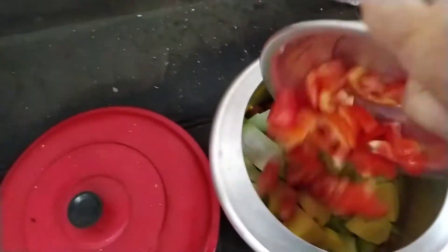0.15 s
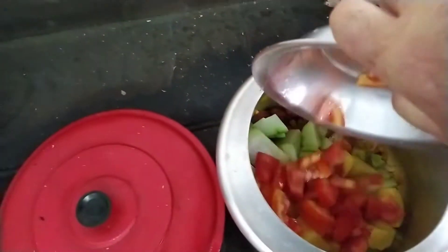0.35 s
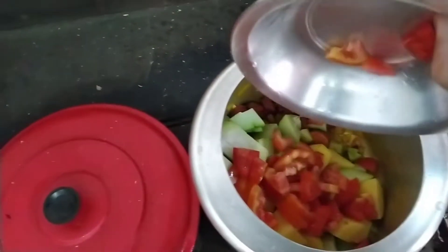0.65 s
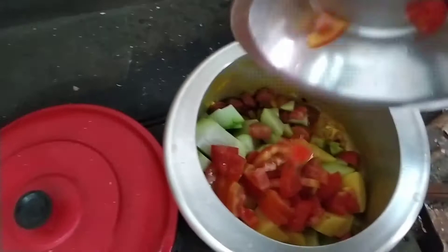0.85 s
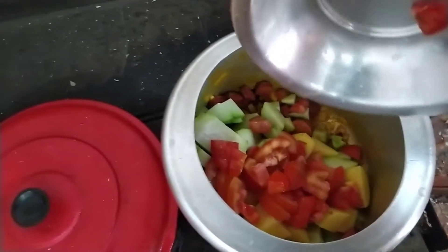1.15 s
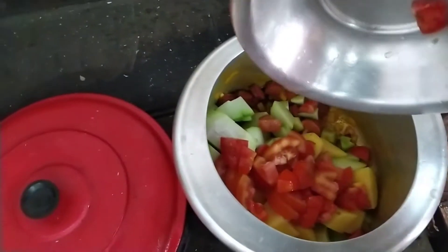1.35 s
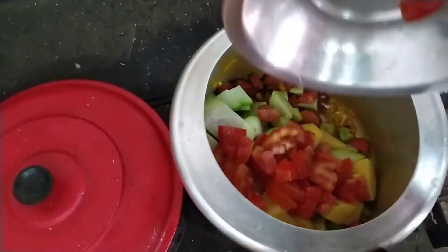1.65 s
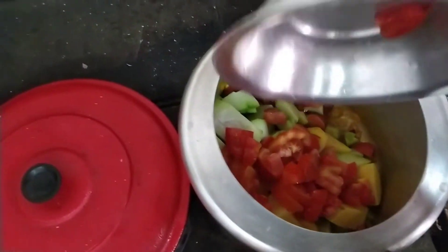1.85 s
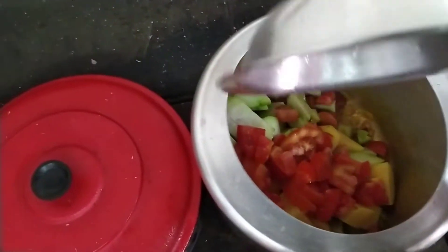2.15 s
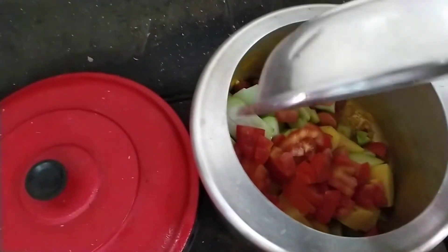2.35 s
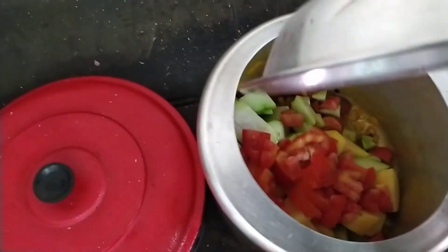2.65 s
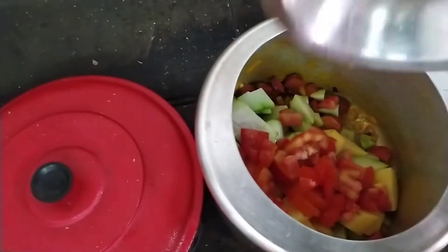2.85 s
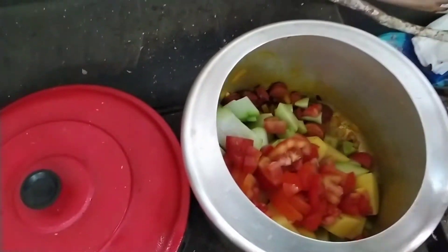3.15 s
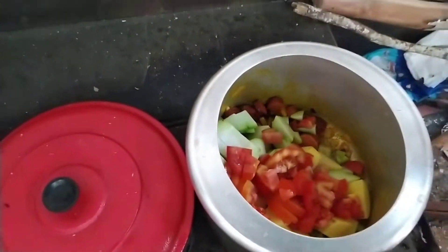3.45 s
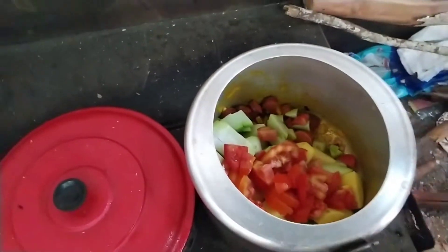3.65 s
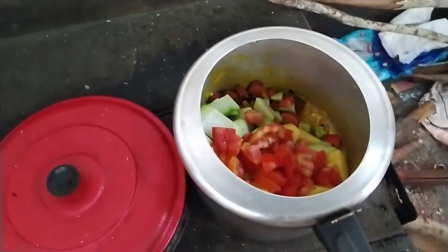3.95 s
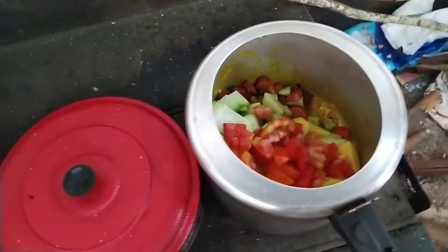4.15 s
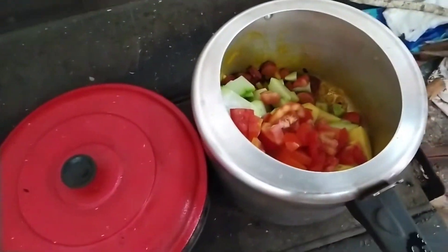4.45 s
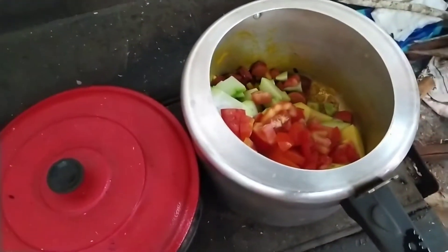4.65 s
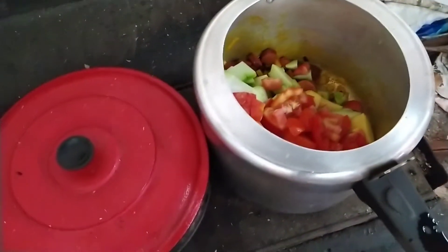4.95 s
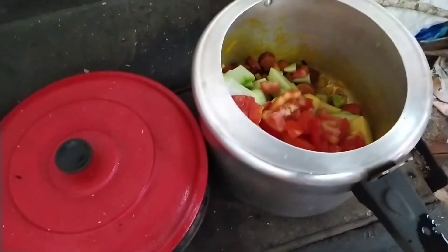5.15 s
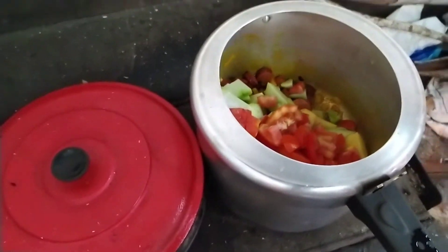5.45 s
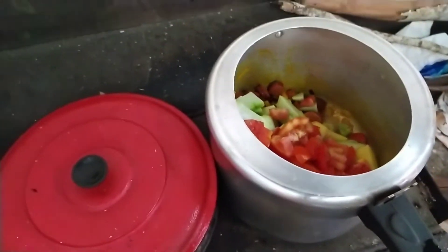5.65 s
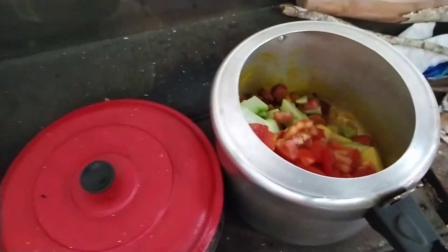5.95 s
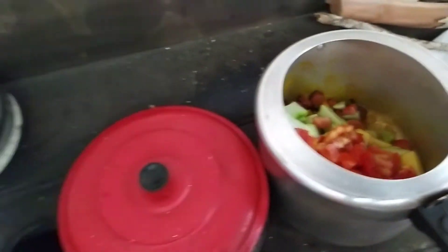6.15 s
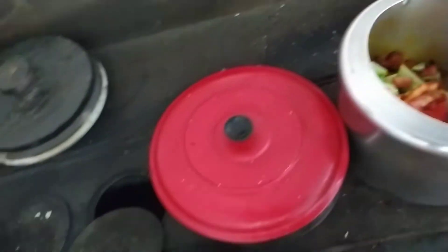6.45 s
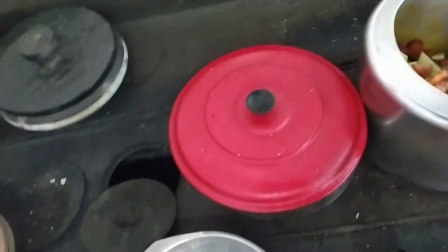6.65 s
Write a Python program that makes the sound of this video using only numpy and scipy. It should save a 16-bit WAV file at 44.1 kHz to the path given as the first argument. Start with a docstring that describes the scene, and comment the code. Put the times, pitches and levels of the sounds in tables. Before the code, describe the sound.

Chopped tomatoes slide off a steel plate into a hot pot, plopping in a quick cluster with a juicy hiss. Steady frying grows stronger under six damped, clanking knocks on the rim, sounding boxier while the plate covers the opening. After a stretch of sizzling alone, the plate clanks down and quickly rocks still. Close handheld stereo microphone in a small kitchen, with low room noise and a weak hum.

```python
"""Frying pot and steel plate

Meat and vegetables sizzle close by in an aluminium pressure pot: random bubble clicks over noise.
Chopped tomato slides in from a steel plate: noise slaps, hollow thuds and pot modes.
The plate is rapped six times on the rim, then put down, where it clanks and rocks to rest:
noise knocks and decaying modes. Low room noise and a wavering hum lie beneath."""
import sys
import numpy as np
from scipy import signal
from scipy.fft import rfft, irfft
from scipy.io import wavfile
from scipy.ndimage import uniform_filter1d

SR = 44100
rng = np.random.default_rng(int(sys.argv[2]) if len(sys.argv) > 2 else 0)


def wrap_up_sound(samples):
    """Save the sound to the file named by the first command line argument, as 16-bit audio."""
    columns = np.atleast_2d(samples).T
    # keep every value between -1 and 1, then stretch to whole-number steps
    tamed = np.clip(columns, -1, 1)
    steps = np.round(tamed * 32767).astype(np.int16)
    wavfile.write(sys.argv[1], SR, steps)


N = 299433

# how hard the pot fries, before trim: time_s, fizz_db, fry_db
FRYING_LEVELS = [(0.0, -42, -47), (0.21, -40.5, -51), (0.49, -41, -52), (0.77, -36.5, -48.5),
                 (1.08, -33, -44), (1.57, -31, -40.5), (1.89, -31.5, -39.5), (2.4, -30, -34.5),
                 (2.93, -33, -40.5), (3.82, -35.5, -43.5), (4.8, -33.5, -43.5), (5.75, -37, -45),
                 (6.17, -34.5, -46), (6.79, -37, -48.5)]
# fine fizz spectrum: freq_hz, density_db (per Hz)
FIZZ_SPECTRUM = [(3000, -40), (6000, -20), (7200, -8.5), (8300, -2.3), (9500, 0), (10200, -.8),
                 (11000, -8.5), (12200, -15.5), (14000, -19), (16000, -20.5)]
# coarser frying spectrum: freq_hz, density_db (per Hz)
FRY_SPECTRUM = [(150, -27), (350, -13), (700, -7), (1300, -5), (2200, 0), (3200, -0.5), (4500, 0.5),
                (6000, 0), (9000, -2.5), (15000, -57)]


def sizzle(fizz_trim_db=2.2, fry_trim_db=4.5, flutter_db=0.9, right_lean_db=0.46):
    """Fine fizz and coarser frying, sputtering together; both swell as tomato juice reaches the fat."""
    t = np.arange(N) / SR
    fine = colour(bubbles(per_s=5000, spread_db=2.0, wash=1.24), FIZZ_SPECTRUM)
    coarse = colour(bubbles(per_s=2200, spread_db=1.6, wash=1.1), FRY_SPECTRUM)
    fizz = pot_air(fine, ripple_db=1.1) * amp(curve(FRYING_LEVELS, t) + fizz_trim_db)
    fry = pot_air(coarse, ripple_db=2.65) * amp(curve(FRYING_LEVELS, t, axis=2) + fry_trim_db)
    leaning_fizz = fizz * amp([[-right_lean_db], [right_lean_db]])
    return (leaning_fizz + fry) * amp(flutter_db * wander(top_hz=22.5))


def bubbles(per_s, spread_db, wash):
    """Steam bubbles bursting in fat: clicks of uneven size over a wash of countless tiny ones."""
    size = amp(spread_db * np.minimum(rng.exponential(1, (2, N)), 5))
    sign = rng.choice([-1, 1], (2, N))
    bursts = rng.random((2, N)) < per_s / SR
    return unit(size * sign * bursts) + wash * rng.standard_normal((2, N))


# air resonances of the pot: freq_hz, width_hz, covered_lift_db, open_lift_db
POT_AIR_MODES = [(422, 27, 13.5, 8.5), (537, 60, 8, 5), (880, 38, 8.5, 8.5), (1024, 100, 8, 5),
                 (1402, 90, -2, 6.5), (2060, 330, 1, 2), (2870, 120, 4, 3.5)]
# the plate over the pot's mouth: time_s, covered_share (0-1)
PLATE_COVER = [(1.8, 1), (2.8, 1), (3.1, 0.18)]


def pot_air(x, ripple_db=1.3, twist_rad=0.37):
    """The air in the pot lifts a few bands, which shift while the plate hangs over it."""
    hz, t, z = signal.stft(x, SR, nperseg=2048)
    cover = np.clip(curve(PLATE_COVER, t), 0, 1)
    lift_db = 0
    for centre_hz, width_hz, covered_db, open_db in POT_AIR_MODES:
        peak_db = cover * covered_db + (1 - cover) * open_db
        lift_db = lift_db + peak_db / (1 + (2 * (hz[:, None] - centre_hz) / width_hz) ** 2)
    # crowded upper resonances: level and phase ripple at each port, drifting as the microphone moves
    drift = uniform_filter1d(rng.standard_normal((2, *z.shape)), size=5, axis=2)
    ripple, swirl = unit(uniform_filter1d(drift, size=14, axis=3))
    crowded = np.interp(hz, [0, 3000, 6500, 8500], [0, 1, 1, .5])[:, None]
    z = z * amp(lift_db + ripple_db * crowded * ripple) * np.exp(1j * twist_rad * crowded * swirl)
    return unit(signal.istft(z, SR, nperseg=2048)[1][:, :N])


# tomato pieces landing, loud and soft: time_s, level_db, slap_t60_s, thud_hz
PLOPS = [(.001, -8.5, 0.043, 610), (.0135, -9, .025, 484), (.034, -8.5, .03, 690), (.054, -10, .04, 550),
         (.058, 0.5, 0.12, 1250), (.074, -2, 0.038, 617), (.081, 1, 0.022, 1600), (.086, -1.5, 0.016, 1167),
         (.112, 0.5, 0.13, 720), (.133, -1, 0.08, 682), (.153, -2, 0.02, 794), (.165, -9, 0.021, 780),
         (0.218, -13.5, 0.066, 844)]
# slap spectrum: freq_hz, density_db (per Hz)
SLAP_SPECTRUM = [(140, -19), (240, 1.5), (370, -7), (530, 1.5), (750, 1), (1020, -8.5), (1220, 2.5),
                 (1410, -8.5), (1590, -1), (1900, -2.5), (3400, -10.5), (7000, -16.5), (9400, -3.5),
                 (12000, -27), (16000, -36)]
# pot wall ringing: freq_hz, level_db, t60_s
POT_WALL_MODES = [(744, -6.5, 0.088), (864, -10, 0.23), (1920, -4.5, 0.12), (2080, -0.5, 0.083),
                  (2660, -7.5, 0.084)]
WALL_S, WALL_SPREAD_S = 0.094, .012  # the heap reaches the pot wall
WALL_DB, HEAP_DB = 4, -7  # pot ring from a piece on the wall, and on the heap
SLAP_BASS_DB, BASS_DB_PER_S = 1.5, -33  # slaps start dull and lose body as the heap gets wet
SLAP_TREBLE_DB, TREBLE_DB_PER_S = -6, 48  # and gain splash


def tomatoes(slap_db=-43, thud_db=-23.0, ring_db=-30):
    """Wet pieces slap onto the vegetables with hollow thuds; later ones reach the wall and ring the pot."""
    out = np.zeros((2, N))
    for s, db, t60, hz in PLOPS + scraps(count=8):
        bass_db = SLAP_BASS_DB + BASS_DB_PER_S * s
        treble_db = SLAP_TREBLE_DB + TREBLE_DB_PER_S * s
        on_wall = (1 + np.tanh((s - WALL_S) / WALL_SPREAD_S)) / 2
        wall_db = HEAP_DB + (WALL_DB - HEAP_DB) * on_wall
        slap = blow(SLAP_SPECTRUM, bass_db, treble_db, t60, slope=0, rise_s=.0016,
                    room_db=-20, room_t60=.2, direct=1)
        thud = ring([(hz, 0, .055)], scatter_db=0, detune=.005, rise_s=.002, echo=.3)
        wall = ring(POT_WALL_MODES, scatter_db=0.5, detune=0.0214, rise_s=0.0011, echo=0.86)
        piece = amp(slap_db) * slap + amp(thud_db) * thud + amp(ring_db + wall_db) * wall
        add(out, s, amp(db) * piece)
    return out


POUR_S, POUR_WIDTH_S = .105, .075  # the heap slides off in one swell: middle and half width
SCRAP_DB = -5  # small pieces in the thick of the pour


def scraps(count):
    """Small pieces at random through the pour, heaviest mid-way: rows of time_s, level_db, t60_s, thud_hz."""
    place = 3 * ((np.arange(count) + rng.random(count)) / count - .5)
    level_db = SCRAP_DB - 10 * np.log10(np.e) * place ** 2
    thud_hz = rng.uniform(478, 1308, count)
    return list(zip(POUR_S + POUR_WIDTH_S * place, level_db, np.full(count, .03), thud_hz))


def splash(hiss_db=-39):
    """Juice flashes on the hot fat for as long as the pour lasts."""
    swell = np.exp(-((np.arange(N) / SR - POUR_S) / POUR_WIDTH_S) ** 2)
    hiss = colour(bubbles(per_s=1400, spread_db=3.5, wash=0.41), FRY_SPECTRUM)
    return amp(hiss_db) * swell * hiss


# last pieces coming loose: time_s, level_db
BUMPS = [(.737, -66.5), (.853, -63)]
# bump spectrum: freq_hz, density_db (per Hz)
BUMP_SPECTRUM = [(100, -21), (238, 4), (427, -4), (800, -1), (1560, -19), (6000, -45)]


def bumps():
    """Soft, dull knocks as the last pieces come loose from the plate."""
    out = np.zeros((2, N))
    for s, db in BUMPS:
        bump = blow(BUMP_SPECTRUM, bass_db=3.0, treble_db=0, t60=0.072, slope=0, rise_s=0.0012,
                    room_db=-18, room_t60=.2, direct=0.81)
        add(out, s, amp(db) * bump)
    return out


# plate on the rim; each contact strengthens or weakens one low and one high pitch:
# time_s, level_db, bass_db, click_db, stove_thump_db, low_hz, low_change_db, high_hz, high_change_db
RAPS = [(1.7207, -4, -1, 3, -4, 500, 9, 2243, 12.5), (2.027, 0.5, -2.5, 3, 0, 754, 18, 2370, 6.5),
        (2.1995, 0, -2.5, 7, -8, 452, 12, 2567, -5), (2.3378, 0.5, 0.5, -8, 4, 864, 9.5, 2567, 2),
        (2.5153, 3, 1.5, -7, 9, 390, 9, 2167, 3), (2.6928, -3, -1, 4, -3, 390, -18, 1915, 2)]
# knock spectrum: freq_hz, density_db (per Hz)
RAP_SPECTRUM = [(80, -19.5), (160, -8), (280, 5), (540, -8), (730, 0), (1020, -14.5), (1550, -10),
                (1880, 1.5), (2250, -1.5), (2900, -2), (3600, -7), (6500, -18.5), (9300, -2.5),
                (12000, -25.5), (16000, -41)]
# plate and pot ringing together: freq_hz, level_db, t60_s
RIM_MODES = [(165, -9, .2), (245, 0, .1), (288, 3, .15), (387, -7, .19), (452, -4, .19), (495, -11, .18),
             (730, 0, .07), (781, -9, .14), (856, -4, .14), (885, -6, .2), (1382, -12, .25),
             (1915, 11, .065), (2167, 2, .13), (2243, -1, .15), (2370, 4.5, .13), (2567, 1.5, .17),
             (2920, 2, .12)]
THUMP_HZ = 33  # stove top


def raps(knock_db=-24.0, ring_db=-23.0, bass_db=-2, thump_db=-45.0, thump_t60=0.4, right_lean_db=0.0):
    """The hand-damped plate clicks and rings on the rim of the full pot, which thumps the stove."""
    out, t = np.zeros((2, N)), np.arange(SR // 2) / SR
    thump = np.sin(2 * np.pi * THUMP_HZ * t) * amp(thump_db - 60 * t / thump_t60)
    for s, db, body_db, click_db, stove_db, low_hz, low_db, high_hz, high_db in RAPS:
        knock = blow(RAP_SPECTRUM, bass_db + body_db, 0, t60=0.05, slope=0.3, rise_s=0.0013,
                     room_db=-19, room_t60=0.26, direct=0.93, side=-.5)
        modes = []
        for hz, mode_db, t60 in RIM_MODES:
            contact_db = low_db * near(hz, low_hz) + high_db * near(hz, high_hz)
            modes.append((hz, mode_db + body_db * (hz < 1000) + contact_db, t60))
        metal = ring(modes, scatter_db=1, detune=0.002, rise_s=0.003, echo=0.3)
        rap = amp(db) * (amp(knock_db) * knock + amp(ring_db) * metal)
        add(out, s, rap + amp(click_db) * click() + amp(stove_db) * thump)
    return walls(out, wet_db=-9.5, t60=0.17) * amp([[-right_lean_db], [right_lean_db]])


CONTACT_WIDTH_HZ = 46


def near(hz, contact_hz):
    """How fully a mode takes the change that the point of contact makes around one pitch, 0-1."""
    return np.exp(-((hz - contact_hz) / CONTACT_WIDTH_HZ) ** 2)


# plate landing, then rocking ever faster: time_s, knock_db, treble_db, click_db, ring_db, shimmer_db
ROCKS = [(4.932, 1.5, 0.5, 4, 0, 0), (4.978, 3.5, -4.5, -10, -5.5, -2.5), (5.0085, 1, -13.5, -18, -6, -3.5),
         (5.029, -11, -10, -26, -7, -15)]
# knock spectrum: freq_hz, density_db (per Hz)
CLANK_SPECTRUM = [(100, -24), (250, -14), (325, 5), (430, 2.5), (500, 1), (840, -1.5), (1280, 5),
                  (1550, -5.5), (1920, 8), (2200, 4.5), (3000, -0.5), (4000, 6.5), (6600, -9), (9500, -3),
                  (12000, -4), (16000, -38)]
# free plate: freq_hz, level_db, t60_s, left_lead_rad
PLATE_MODES = [(790, -8, 0.25, -0.88), (822, -13, .2, -1.3), (852, 3, 0.25, -1.65), (1081, -17, .35, -2),
               (1186, -19, 0.33, -1.8), (1705, -18, .2, 2), (1917, -8, 0.26, 2.6), (1990, -13, .26, 2.6),
               (2505, -14, .2, .7), (2626, -3.5, 0.22, 0.74), (4030, -12.5, 0.25, -1.3),
               (4667, -18, .25, .5), (5140, -16, .28, 1.6)]
# crowded upper plate modes: freq_hz, density_db (per Hz)
SHIMMER_SPECTRUM = [(1200, -27), (2000, -16), (3000, -12), (4000, -15), (5700, -7), (7400, -10),
                    (8300, -19), (9400, -3), (10500, -11), (15000, -44)]
REST_S, CHOKE_T60_S = 5.044, 0.087  # the plate lies flat; how fast a contact stops its ring
SETTLE_SAG = 0.046  # pitch drop on the way to rest, share


def clanks(knock_db=-29.5, ring_db=-7, shimmer_db=-29, left_lean_db=1):
    """The plate lands ringing, then rocks to rest; each contact chokes the last ring and sounds flatter."""
    out, t = np.zeros((2, N)), np.arange(SR // 2) / SR
    land_s, lowest_hz = ROCKS[0][0], PLATE_MODES[0][0]
    ends = [row[0] for row in ROCKS[1:]] + [REST_S]
    for (s, db, treble_db, click_db, tone_db, crowd_db), until in zip(ROCKS, ends):
        knock = blow(CLANK_SPECTRUM, 0, treble_db, t60=.04, slope=0, rise_s=.0014,
                     room_db=-12, room_t60=.28, direct=.7)
        shimmer = blow(SHIMMER_SPECTRUM, 0, 0, t60=.2, slope=0, rise_s=.002,
                       room_db=-20, room_t60=.24, direct=.7)
        pitch = 1 - SETTLE_SAG * ((s - land_s) / (REST_S - land_s)) ** 2
        modes = []
        for hz, mode_db, t60, lead in PLATE_MODES:
            # duller contacts wake the upper modes less
            tilt_db = treble_db * np.log10(hz / lowest_hz)
            modes.append((hz * pitch, mode_db + tilt_db, t60, lead))
        tones = ring(modes, scatter_db=.3, detune=0.002, rise_s=0.003, echo=0.28)
        tones = amp(ring_db + tone_db) * tones * amp([[left_lean_db], [-left_lean_db]])
        metal = tones + amp(shimmer_db + crowd_db) * shimmer
        choke_db = -60 * np.maximum(s + t - until, 0) / CHOKE_T60_S
        add(out, s, amp(knock_db + db) * knock + amp(click_db) * click() + amp(choke_db) * metal)
    return walls(out, wet_db=-9.5, t60=0.27)


# metal meeting metal: freq_hz, density_db (per Hz)
CLICK_SPECTRUM = [(1000, -9), (3500, -11), (6500, -6.5), (9500, 9), (12000, -11), (15000, -19.5)]


def click(click_db=-37.0, t60=0.0033, rise_s=0.0024):
    """The bright instant of metal meeting metal."""
    return amp(click_db) * blow(CLICK_SPECTRUM, 0, 0, t60, slope=0, rise_s=rise_s,
                                room_db=-29, room_t60=0.19, direct=1.0)


def blow(spectrum, bass_db, treble_db, t60, slope, rise_s, room_db, room_t60, direct, side=1):
    """A crowd of fast-dying modes and their room tail; bending waves bring treble first and bass later."""
    t, hz = np.arange(SR // 2) / SR, np.fft.rfftfreq(SR // 2, 1 / SR)
    white = np.exp(2j * np.pi * rng.random((2, len(hz))))
    z = ports(*white, hz, direct, side)
    centres, out = np.geomspace(100, 14000, 9), 0
    for centre_hz, pick in zip(centres, np.eye(len(centres))):
        khz = centre_hz / 1000
        fall = amp(-60 * t / (t60 * khz ** -slope))
        tail = amp(room_db - 60 * t / room_t60)
        onset = 1 - np.exp(-(t * khz ** 0.19 / rise_s) ** 2)
        band = np.interp(np.log(hz + 1), np.log(centres), pick)
        out = out + irfft(z * band) * unit((fall + tail) * onset)
    gain = amp(read(spectrum, hz))
    tilt_db = read([(500, bass_db), (1500, 0), (3000, 0), (8000, treble_db)], hz)
    # minimum phase keeps the colouring from sounding ahead of the attack
    log_gain = np.log(unit(gain) * amp(tilt_db))
    mirrored = np.r_[log_gain, log_gain[-2:0:-1]]
    causal = np.exp(np.conj(signal.hilbert(mirrored)))[:len(hz)]
    return irfft(rfft(unit(out)) * causal)


def ring(modes, scatter_db, detune, rise_s, echo):
    """Decaying modes; the point of contact varies them, and room echoes make each one flutter."""
    t, out = np.arange(SR // 2) / SR, 0
    knots = np.linspace(0, .5, num=50)
    for hz, db, t60, *lead in modes:
        size, bend, phase, side = rng.standard_normal(4)
        apart = lead[0] if lead else side * 2 * (1 - read(PORTS, hz))
        angle = 2 * np.pi * (hz * (1 + detune * bend) * t + phase) - np.array([[0], [apart]])
        # echoes build up within hundredths of a second, in changing phase at each port
        turns = np.exp(2j * np.pi * rng.random((2, len(knots))))
        echoes = np.array([np.interp(t, knots, row) for row in turns])
        build_up = 1 - np.exp(-t / 0.012)
        wave = np.exp(1j * angle) * (1 + echo * build_up * echoes)
        out = out + amp(db + scatter_db * size - 60 * t / t60) * wave.imag
    return out * (1 - np.exp(-t / rise_s))


def walls(x, wet_db, t60, first_s=0.0081):
    """Adds echoes of the stove top and kitchen walls: sparse taps of random sign, others at each port."""
    t = np.arange(SR // 2) / SR
    sign = rng.choice([-1, 1], (2, len(t)))
    taps = sign * (rng.random((2, len(t))) < 2000 / SR)  # 2000 per s
    taps = taps * (t > first_s) * amp(-60 * t / t60)
    taps = taps / np.linalg.norm(taps, axis=1, keepdims=True)
    return x + amp(wet_db) * signal.oaconvolve(x, taps, axes=1)[:, :N]


# room noise: freq_hz, density_db (per Hz)
ROOM_SPECTRUM = [(20, 5), (45, -7), (70, -8.5), (98, -2.5), (135, -13), (215, -4.5), (300, -6),
                 (700, -13.5), (2000, -29)]
HUM_HZ, HUM_DB = 218, -60.5
TURN_AWAY_S, TURN_DB_PER_S = 5, 2.5


def kitchen(floor_db=-56.5, waver_db=1.0):
    """Low room noise and an appliance's wavering hum, which fades as the microphone turns away."""
    t = np.arange(N) / SR
    room = colour(rng.standard_normal((2, N)), ROOM_SPECTRUM)
    turn_db = -TURN_DB_PER_S * np.maximum(t - TURN_AWAY_S, 0)
    hum_db = HUM_DB + turn_db + waver_db * wander(top_hz=1.2)
    hum = unit(np.sin(2 * np.pi * HUM_HZ * t))
    return amp(floor_db) * room + amp(hum_db) * hum


def wander(top_hz):
    """Slow random drift of rms 1: low-passed noise."""
    hz = np.fft.rfftfreq(N, 1 / SR)
    return unit(irfft(rfft(rng.standard_normal(N)) * np.exp(-(hz / top_hz) ** 2), N))


def colour(x, spectrum):
    """Gives a pair of white signals a spectrum and the stereo image of the ports, at rms 1."""
    hz = np.fft.rfftfreq(x.shape[1], 1 / SR)
    return unit(irfft(ports(*rfft(x), hz) * amp(read(spectrum, hz)), x.shape[1]))


# two microphone ports: freq_hz, likeness (0-1), left_lead_rad
PORTS = [(30, .55, 0), (250, .88, .2), (825, .72, .2), (1600, .45, 1.05), (3000, .36, 1), (5500, .45, 2),
         (7000, .68, .3), (9000, .87, .4), (11500, .6, .6), (16000, .4, 0)]


def ports(a, b, hz, direct=1, side=1):
    """Turns unrelated spectra into partly alike left and right; a negative side lets the right lead."""
    same = np.clip(direct * read(PORTS, hz), 0, 1)
    lag = np.exp(-1j * side * read(PORTS, hz, axis=2))
    return np.array([a, (same * a + np.sqrt(1 - same ** 2) * b) * lag])


def amp(db):
    """Decibels to gain."""
    return 10 ** (np.asarray(db) / 20)


def unit(x):
    """Scales to rms 1."""
    return x / np.sqrt(np.mean(x ** 2) + 1e-20)


def read(points, hz, axis=1):
    """One column of a table, joined on a log-frequency axis."""
    table = np.array(points, float)
    return np.interp(np.log(hz + 1), np.log(table[:, 0] + 1), table[:, axis])


def curve(rows, t, axis=1):
    """One column of a table, joined in time."""
    table = np.array(rows, float)
    return np.interp(t, table[:, 0], table[:, axis])


def add(mix, s, sound):
    """Mixes a stereo sound in at time s."""
    part = mix[:, max(round(s * SR), 0):][:, :sound.shape[1]]
    part += sound[:, :part.shape[1]]


def scene():
    """Everything heard at the stove."""
    return sizzle() + tomatoes() + splash() + bumps() + raps() + clanks() + kitchen()


EDGE_HZ = 16000


def record(dry, limit_db=-6, detector_fall_db_per_s=40):
    """Halves the dB excess over a limit, so knocks briefly duck the sizzle; then clips and low-passes."""
    peak_db = 20 * np.log10(abs(dry).max(0) + 1e-9)
    fall_db = np.arange(N) / SR * detector_fall_db_per_s
    held_db = np.maximum.accumulate(peak_db + fall_db) - fall_db
    over_db = np.maximum(held_db - limit_db, 0)
    ducked = dry * amp(-.5 * uniform_filter1d(over_db, size=90))
    low_pass = signal.firwin(511, EDGE_HZ, window=("kaiser", 9), fs=SR)
    return signal.oaconvolve(np.clip(ducked, -1, 1), low_pass[None], "same")


dry = scene()
out = record(dry)
wrap_up_sound(out)
```